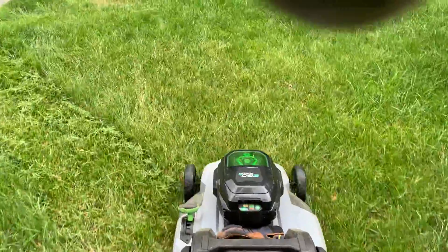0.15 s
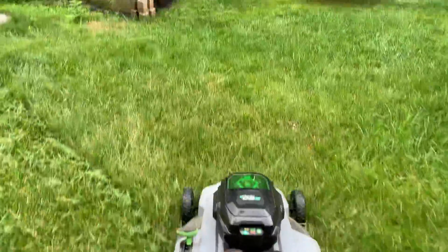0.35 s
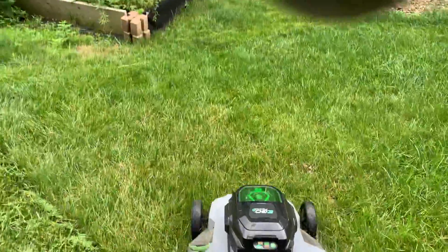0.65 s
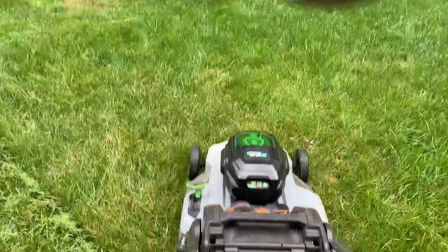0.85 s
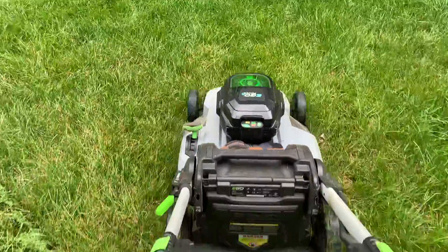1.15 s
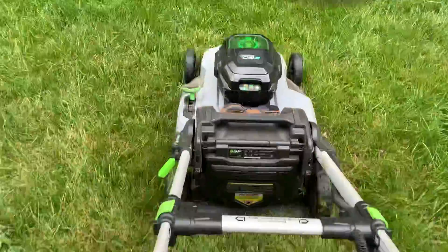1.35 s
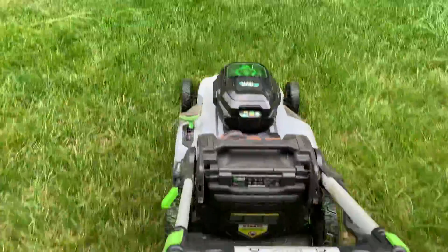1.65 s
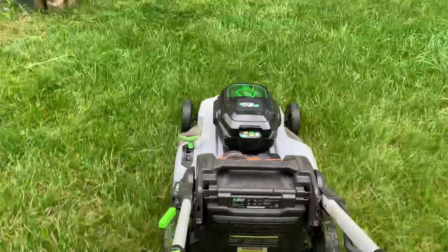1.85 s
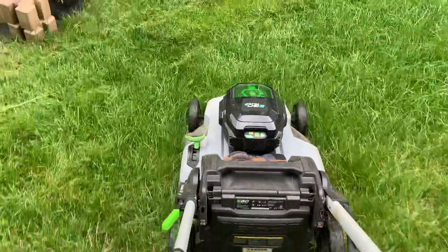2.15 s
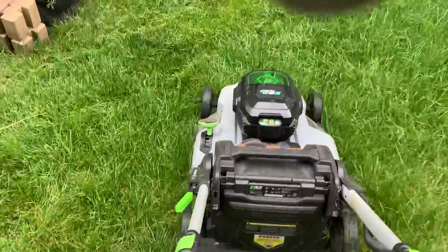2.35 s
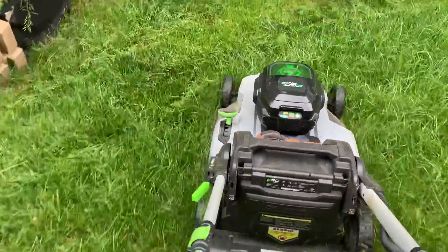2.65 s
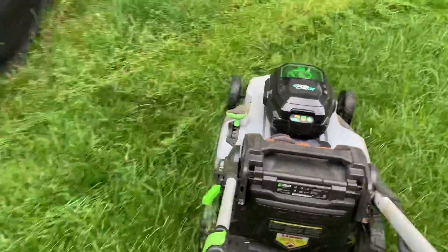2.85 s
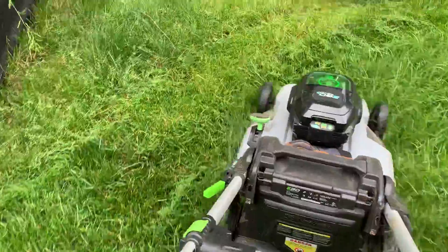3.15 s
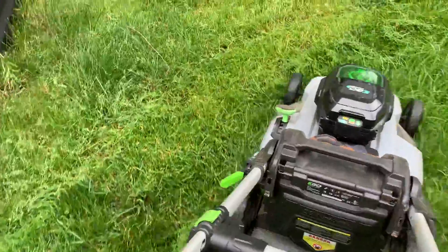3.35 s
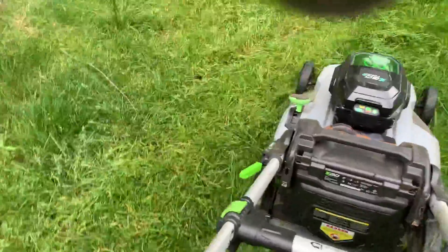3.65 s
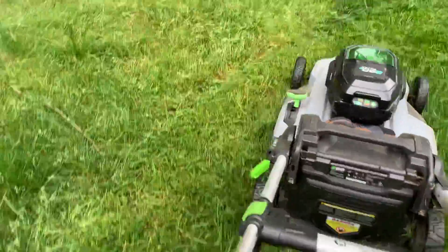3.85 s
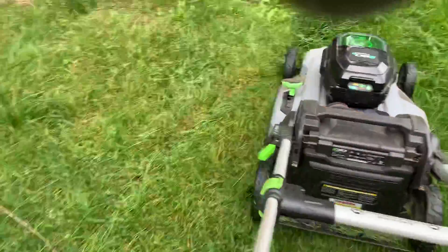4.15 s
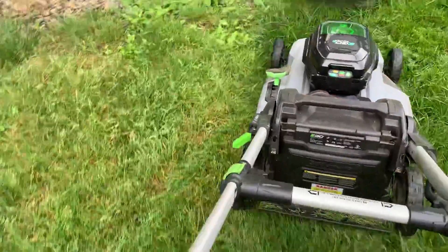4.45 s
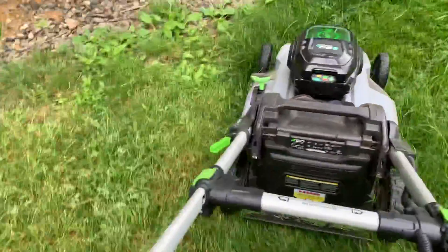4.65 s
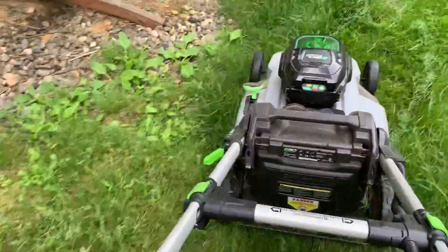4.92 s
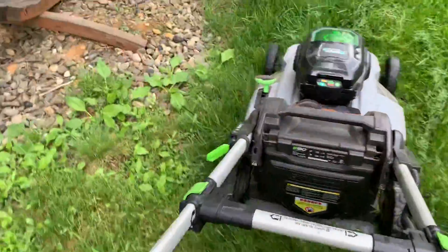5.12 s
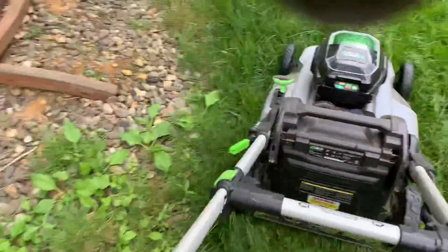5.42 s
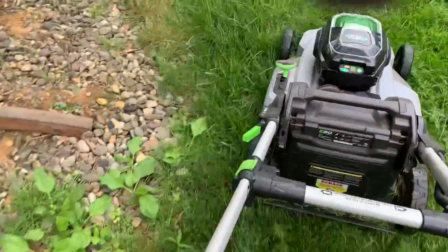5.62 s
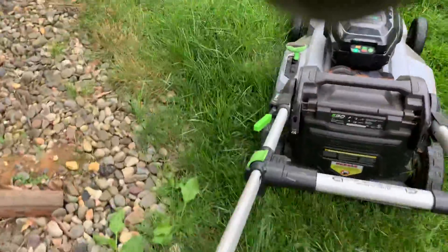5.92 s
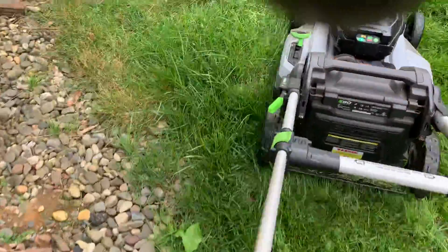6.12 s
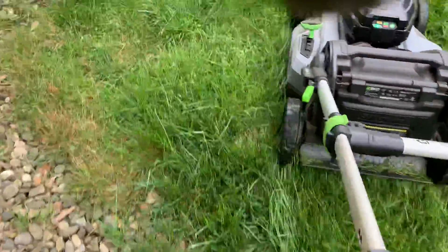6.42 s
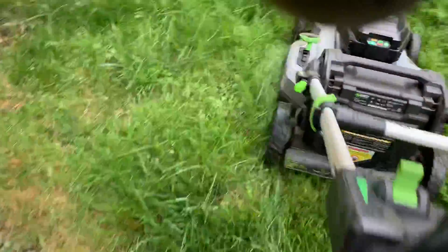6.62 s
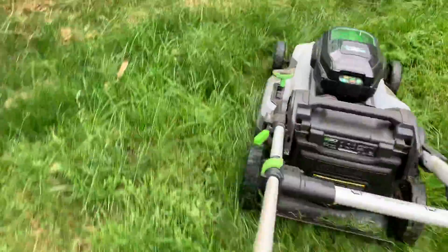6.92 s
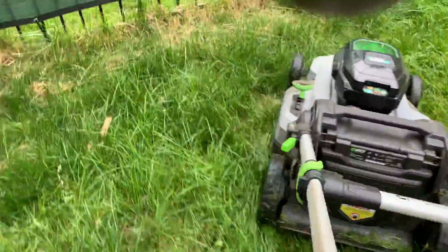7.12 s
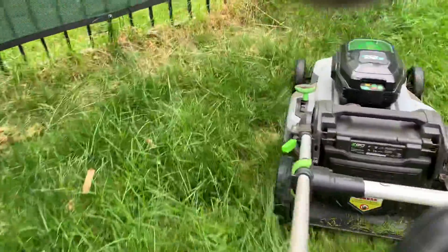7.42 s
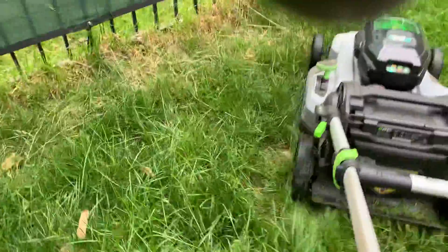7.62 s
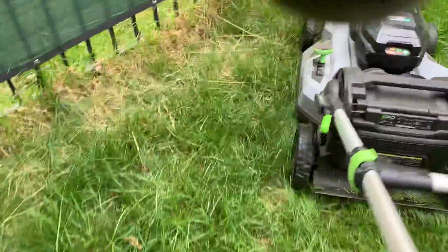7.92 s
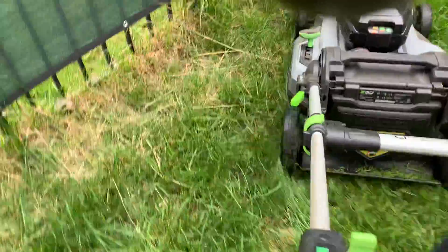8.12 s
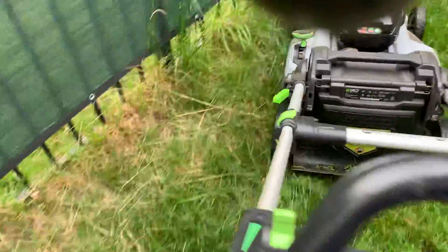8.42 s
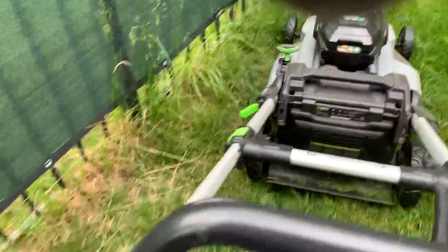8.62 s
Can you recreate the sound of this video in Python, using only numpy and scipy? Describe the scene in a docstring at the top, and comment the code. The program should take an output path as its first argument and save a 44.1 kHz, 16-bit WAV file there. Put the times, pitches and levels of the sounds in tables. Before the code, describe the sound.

A cordless electric mower hums and whines over a lawn, its drive whistling unsteadily, with thick grass thrashing and debris knocking the deck toward the end.

```python
"""Cordless mower on a lawn

A cordless mower pushed over a lawn, heard from the handle. The two-ended blade beats the air under the deck
as wavering harmonics; it speeds up, sags under load and starts to run down at the end. The motor whines
in step with it as thin sines, and the wheel drive whistles as a sine roughened by narrow noise.
Air and clippings roar and hiss as shaped stereo noise, thick grass thrashes in noise bursts,
and a few bits strike the deck as decaying sines and noise."""
import sys
import numpy as np
from scipy import signal
from scipy.fft import rfft, irfft, next_fast_len
from scipy.io import wavfile
from scipy.ndimage import uniform_filter1d, map_coordinates

SR = 44100
rng = np.random.default_rng(int(sys.argv[2]) if len(sys.argv) > 2 else 0)


def generate_wav(signal):
    """Clip the signal to [-1, 1] and save it as 16-bit WAV at the path in sys.argv[1]."""
    frames = np.transpose(np.atleast_2d(signal))
    scaled = np.clip(frames, -1, 1) * 32767
    pcm = np.round(scaled).astype(np.int16)
    wavfile.write(sys.argv[1], SR, pcm)


N = 386757

# Blade speed and its two strongest harmonics:
# (time [s], blade passes [Hz], first harmonic [dB], second harmonic [dB])
BLADE_COURSE = [(0.0, 95.61, -30, -28.5), (0.54, 98.5, -27.5, -23), (1.3, 107.2, -24, -22.5),
                (1.7, 108.2, -24, -24.5), (1.92, 111.1, -24.5, -22), (2.36, 111.9, -22.5, -20),
                (2.94, 109.7, -25.5, -20), (3.52, 110.1, -23, -20), (3.84, 104.7, -25.0, -26),
                (4.08, 103.3, -27, -22), (4.52, 104.9, -25.5, -22), (5.12, 110, -23.5, -24),
                (5.3, 107.9, -22.5, -20), (5.82, 110.5, -23.5, -20), (6.16, 106.3, -23, -18.5),
                (6.42, 108.4, -24.5, -17.5), (6.64, 107.7, -22, -27.5), (7.16, 108.9, -28.5, -17),
                (7.32, 107.3, -24.5, -24), (7.66, 107.4, -23.5, -25.5), (7.92, 109.4, -25, -24),
                (8.36, 106.3, -23.5, -21.5), (8.77, 99.8, -22, -37.5)]
# Colour of the hiss and of the sprayed clippings: (frequency [Hz], relative gain [dB])
HISS_COLOUR = [(3000, -4.5), (5500, -5), (8000, 0), (11500, 0), (16000, -7)]
MID_LAG_S, TREBLE_LAG_S = 4e-5, 1 / 4665  # delay of the left port behind the right


def amp(db):
    """Gain of a level in dB."""
    return 10 ** (np.asarray(db) / 20)


def unit(x):
    """x at rms 1."""
    return x / np.sqrt(np.mean(x ** 2) + 1e-20)


def along(points, hz):
    """Value at hz from (frequency [Hz], value) points on a log axis."""
    f, v = np.transpose(points)
    return np.interp(np.log(hz + 1), np.log(f + 1), v)


def shape(points):
    """Gain against frequency from (frequency [Hz], gain [dB]) points."""
    return lambda hz: amp(along(points, hz))


def curves(rows):
    """One value per sample for each column after the time."""
    s, *cols = np.transpose(rows)
    return [np.interp(np.arange(N) / SR, s, c) for c in cols]


def wobble(rate):
    """A smooth random curve, rate knots a second."""
    knots = rng.standard_normal(int(N * rate / SR) + 4)
    return map_coordinates(knots, [np.arange(N) * rate / SR])


def angle(hz):
    """Running phase of a changing frequency."""
    return 2 * np.pi * np.cumsum(hz) / SR


def filtered(x, response):
    """x passed through a complex response of frequency."""
    m = next_fast_len(N + SR // 2)
    return irfft(rfft(x, m) * response(np.fft.rfftfreq(m, 1 / SR)), m)[..., :N]


def lagged(pair, lag_s):
    """The left port hears the sound lag_s after the right."""
    sides = np.array([[1], [-1]])
    return filtered(pair, lambda hz: np.exp(-1j * np.pi * hz * lag_s * sides))


def tone(phase, db, flutter_db, smear, rate):
    """A sine around rms level db; its level and its phase (smear, radians) waver."""
    level = np.sqrt(2) * amp(db + flutter_db * wobble(rate))
    return level * np.sin(phase + smear * wobble(rate) + rng.uniform(0, 2 * np.pi))


def hoarse(phase, rate):
    """Narrow noise of rms 1 riding on a pitch; a higher rate widens it."""
    return unit(wobble(rate) * np.cos(phase) + wobble(rate) * np.sin(phase))


def rush(gain, patchy_db, lag_s):
    """Stereo noise of rms 1, coloured by gain, with time-frequency patches of random level."""
    # Left-right correlation of the noise: (frequency [Hz], likeness [0 to 1])
    likeness = [(60, 0.7), (300, 0.93), (700, 0.88), (1500, 0.67), (3000, 0.09), (5500, 0.46), (7500, 1),
                (15000, 1)]
    z = signal.stft(rng.standard_normal((2, N)), nperseg=512)[2]
    field = uniform_filter1d(rng.standard_normal(z.shape[1:]), size=6, axis=0)
    field = uniform_filter1d(field, size=10, axis=1)
    pair = signal.istft(z * amp(patchy_db * unit(field)), nperseg=512)[1][:, :N]

    def mid_side_gains(hz):
        """Split between middle and side that gives the wanted likeness."""
        turn = np.arccos(np.clip(along(likeness, hz), -1, 1)) / 2
        return gain(hz) * np.array([np.cos(turn), np.sin(turn)])

    mid, side = filtered(pair, mid_side_gains)
    return unit(lagged(np.array([mid + side, mid - side]), lag_s))


def air(phase):
    """Air and clippings swirl under the deck, throbbing with each pass; hiss reaches the right port first."""
    # Flow levels before the trims below: (time [s], roar [dB], rustle [dB], hiss [dB])
    flow = [(0.0, -32, -39, -39), (2.47, -31, -37.5, -38.5), (3.59, -30.5, -40.5, -39.5),
            (4.05, -31.5, -40, -40.5), (6.42, -32, -40.5, -39.5), (6.79, -31, -38.5, -41.5),
            (8.77, -29.5, -38.5, -38.5)]
    # Colours of the layers: (frequency [Hz], relative gain [dB])
    rumble_colour = [(22, -50), (45, -17), (80, -12.5), (140, -3), (250, 2), (400, -2.5), (700, -10.5),
                     (1200, -68)]
    roar_colour = [(150, -20), (350, -2.5), (600, -2.5), (1000, -2), (1380, -1.5), (1700, -6), (2250, -11),
                   (2500, -23), (4000, -50)]
    rustle_colour = [(900, -64), (2000, 3.5), (3000, -1), (4200, -1), (5500, -8), (7000, -13),
                     (10000, -101)]
    # Narrow air resonance of the deck: (time [s], level [dB])
    drone_course = [(0.0, -34), (0.09, -26), (0.3, -34), (0.7, -29), (1.0, -37), (1.32, -26.5), (1.45, -40),
                    (1.62, -27), (1.85, -36.5), (3.7, -40), (3.9, -32.5), (4.4, -33), (5.4, -37.5),
                    (5.62, -26.5), (5.86, -42), (6.55, -40), (7.15, -29.5), (7.9, -34.5), (8.67, -44),
                    (8.77, -44)]
    roar_db, rustle_db, hiss_db = curves(flow)
    throb = np.cos(phase) + .3 * np.cos(phase / 2 + 1.16)  # the two blade ends differ
    gust = wobble(9)

    rumble_db = -25.5 + 0.48 * wobble(1.9) + 1.0 * throb
    roar_db = roar_db + 3.5 + 0.78 * gust + 1.7 * throb
    rustle_db = rustle_db + 5.5 + 1.0 * gust + 0.49 * throb
    hiss_db = hiss_db + 6.0 + 0.48 * gust + 0.73 * wobble(30) + 0.88 * throb
    out = amp(rumble_db) * rush(shape(rumble_colour), patchy_db=.5, lag_s=0)
    out += amp(roar_db) * rush(shape(roar_colour), patchy_db=0.7, lag_s=MID_LAG_S)
    out += amp(rustle_db) * rush(shape(rustle_colour), patchy_db=2.0, lag_s=MID_LAG_S)
    out += amp(hiss_db) * rush(shape(HISS_COLOUR), patchy_db=2.0, lag_s=TREBLE_LAG_S)

    resonance = lambda hz: 1 / (1 + ((hz - 750) / 16) ** 2)
    return out + amp(curves(drone_course)[0]) * rush(resonance, patchy_db=0.5, lag_s=MID_LAG_S)


def tufts(phase):
    """Thick grass thrashes the deck in lumps at each pass and sprays out clippings."""
    # Patches of thick grass: (start [s], length [s], thrash [dB], spray [dB])
    patches = [(6.709, 0.087, -18.5, -50), (7.035, 0.2, -22.5, -52), (7.203, 0.077, -26, -33),
               (7.417, 0.087, -35, -32), (7.725, 0.39, -20.5, -34.5)]
    # Colour of the thrash: (frequency [Hz], relative gain [dB])
    thrash_colour = [(60, -23), (140, 6), (550, -2), (1000, -5.5), (1800, -14), (3000, -22.5), (4500, -45)]
    t = np.arange(N) / SR
    thrash, spray = np.zeros((2, N))
    for s, length, thrash_db, spray_db in patches:
        swell = np.sin(np.pi * np.clip((t - s) / length, 0, 1) ** 0.49)  # rises faster than it falls
        thrash += amp(thrash_db) * swell
        spray += amp(spray_db) * swell
    lumps = amp(1.4 * wobble(110) + 1.5 * wobble(35) + 2.5 * np.cos(phase))
    return (thrash * lumps * rush(shape(thrash_colour), patchy_db=3.0, lag_s=MID_LAG_S)
            + spray * rush(shape(HISS_COLOUR), patchy_db=-3.0, lag_s=TREBLE_LAG_S))


def strikes():
    """Bits flung by the blade: a short tick, a crack, a dull knock and the deck's thump, all dying away."""
    # Each hit: (time [s], overall level [dB], tick pitch [Hz], then levels within the hit:
    # crack [dB], knock [dB], thump [dB])
    hits = [(5.669, -14, 2005, -2, -4, -12), (5.676, -17, 3370, -8, -12, -15),
            (5.735, -14.5, 2250, -5, -4, -12), (6.71, -11, 3000, -5, 0, -8), (6.717, -12, 820, -10, 2, -6),
            (7.067, -17, 2800, -1, 1, -6), (7.113, -16, 850, -7, 2, -5), (7.146, -17, 900, -7, 3, -10),
            (7.218, -18, 750, -10, 3, 0), (7.768, -21, 1595, -2, 2, -5), (7.798, -18, 960, -6, 1, -4),
            (7.814, -15, 420, -12, 5, 4), (7.866, -21, 1346, -7, 5, 0), (7.881, -17.5, 1200, -6, 3, 5)]
    deck_hz = 225
    crack_band = signal.butter(3, [1000, 3800], 'band', fs=SR, output='sos')
    knock_band = signal.butter(2, [150, 1400], 'band', fs=SR, output='sos')
    out, t = np.zeros(N + SR), np.arange(SR // 10) / SR
    onset = 1 - np.exp(-t / 0.0014)
    for s, db, hz, crack_db, knock_db, thump_db in hits:
        # each part falls 60 dB in the time [s] that divides t
        tick = amp(-2.5 - 60 * t / 0.02) * np.sin(2 * np.pi * hz * t)
        crack = signal.sosfilt(crack_band, 2 * rng.standard_normal(len(t)))
        crack *= amp(crack_db - 60 * t / 0.03)
        knock = signal.sosfilt(knock_band, 3 * rng.standard_normal(len(t)))
        knock *= amp(knock_db - 60 * t / 0.035)
        thump = amp(thump_db - 60 * t / 0.083) * np.sin(2 * np.pi * deck_hz * t)
        out[round(s * SR):][:len(t)] += amp(db) * (tick + crack + knock + thump) * onset
    return out[:N]


def drive():
    """The wheel drive whistles hoarsely, pulsing each turn, slowed by bumps; gears whirr an octave up."""
    # Wheel drive, levels before the trims below:
    # (time [s], free-running whistle [Hz], whistle [dB], gear whirr [dB])
    drive_course = [(0.0, 2223, -45, -45), (0.7, 2166, -39, -42), (0.95, 2170, -48, -44),
                    (1.9, 2180, -38, -38.5), (2.2, 2172, -43, -39), (2.34, 2163, -39, -34),
                    (2.5, 2186, -38.5, -41), (2.9, 2225, -35, -36), (3.22, 2232, -38, -40.5),
                    (3.5, 2200, -41, -46), (4.15, 2207, -39, -40.5), (4.35, 2225, -41.5, -44),
                    (5.0, 2250, -37, -40.5), (5.25, 2170, -42, -43), (5.6, 2210, -36, -41),
                    (5.77, 2260, -36.5, -45), (5.95, 2207, -48, -50), (6.2, 2175, -35, -41),
                    (6.38, 2230, -39, -60), (6.62, 2155, -42, -40), (6.8, 2160, -47, -50),
                    (6.96, 2160, -40, -37), (7.13, 2300, -38, -47), (7.34, 2255, -41, -54),
                    (7.45, 2247, -35, -51), (7.58, 2270, -41, -50), (7.72, 2250, -37, -41),
                    (7.88, 2257, -38, -41), (8.0, 2270, -41, -39), (8.12, 2280, -44, -43),
                    (8.35, 2217, -42, -61), (8.55, 2190, -42, -35.5), (8.77, 2224, -41, -39)]
    # A wheel hits a bump and the drive slows: (time [s], sag of the whistle [Hz])
    bumps = [(.58, 70.3), (.84, 70.7), (1.13, 80.2), (1.45, 80.2), (1.79, 89.9), (2.11, 69.5),
             (2.49, 89.86), (2.66, 175.1), (2.8, 100.1), (2.95, 120.3), (3.12, 100.2), (3.38, 120.3),
             (3.52, 90.6), (3.74, 118.4), (3.98, 189.2), (4.27, 130.7), (4.48, 71.1), (4.62, 159.5),
             (4.79, 120.2), (4.89, 189.6), (5.12, 110), (5.35, 70.3), (5.49, 119.6), (5.69, 89.3),
             (5.84, 190), (6.08, 139.8), (6.29, 131), (6.5, 282), (6.67, 70), (6.85, 260), (7.05, 170),
             (7.245, 289), (7.46, 109.8), (7.67, 290), (7.82, 151), (7.99, 298), (8.22, 140.2),
             (8.39, 90.2), (8.53, 100.2), (8.69, 200)]
    teeth = 46  # whistle cycles in one turn of the drive shaft
    sag_s, recover_s, shake_hz = .035, .045, 14  # slowing down, picking up again, shaking in between
    free_hz, whistle_db, whirr_db = curves(drive_course)
    t = np.arange(N) / SR
    sag_hz = sum(hz * np.exp(-((t - s) / np.where(t < s, sag_s, recover_s)) ** 2) for s, hz in bumps)
    phase = angle(free_hz - sag_hz + shake_hz * wobble(13))
    turn = unit(amp(5 * np.cos(phase / teeth) + 2 * np.cos(2 * phase / teeth + .8)))  # uneven mesh

    whistle = tone(phase, whistle_db + 1.5, flutter_db=1.2, smear=.3, rate=40)
    whistle += amp(whistle_db - 7) * hoarse(phase, rate=150)
    octave = amp(whirr_db - 3 + 3 * wobble(14)) * hoarse(2 * phase, rate=360)
    band = lambda hz: 1 / (1 + ((hz - 4300) / 310) ** 4)
    broad = amp(whirr_db - 5) * rush(band, patchy_db=2, lag_s=0)
    return turn * whistle + np.sqrt(turn) * octave + broad


def motor(passes_hz):
    """Thin tones locked to the blade speed, loud while they cross the housing's resonances."""
    # Pitch of each motor tone: (multiple of blade passes)
    whine_orders = (12.35, 12.8, 14.22)
    # Strength of each motor tone, added to the housing's: (relative level [dB])
    whine_db = (0, -1, -6.5)
    # The motor housing favours some pitches: (frequency [Hz], level [dB])
    housing = [(1200, -48), (1290, -45), (1335, -38), (1378, -32.5), (1400, -35.5), (1430, -38),
               (1480, -36), (1540, -55), (1600, -48)]
    whine = 0
    for order, db in zip(whine_orders, whine_db):
        hz = order * passes_hz
        level_db = db + along(housing, hz) + 0.8 * wobble(2)
        whine += tone(angle(hz), level_db, flutter_db=1.4, smear=.22, rate=15)
    return whine


def blade(passes_hz):
    """Each pass pushes the air; grass and turbulence roughen the higher harmonics more."""
    # The third harmonic is loudest where the deck booms: (frequency [Hz], level [dB])
    deck_boom = [(285, -28), (310, -24), (325, -29), (340, -31.5)]
    # The hum dips or swells briefly, change in level:
    # (centre [s], half width [s], first harmonic [dB], second harmonic [dB], third harmonic [dB])
    dips = [(.27, 0.027, -1, -13, 2.5), (.36, 0.024, -1, 0, -12), (.58, 0.04, 1, -13, -6),
            (.76, 0.093, 1, 3.5, 2), (1.18, 0.028, -2, -9, -1), (1.3, 0.032, 0, 0, -6),
            (1.39, 0.053, -2, 1.5, 5), (3.19, 0.1, -1.5, -13, -15), (4.3, 0.089, -1, -5, -2),
            (5.86, 0.036, -4, -8, 7), (6.04, 0.05, 1, -18, -1), (6.36, 0.061, 0.5, -18, -19),
            (6.72, 0.049, -3, -4, 0.5), (7.18, 0.083, -5, -7, 2.5), (7.43, 0.069, -1, -15, 0.5),
            (8.1, 0.081, 3, -2, 10), (8.22, 0.051, 1, -3, -16), (8.7, 0.18, -3, 5.5, -17)]
    # Fourth harmonic: (time [s], level [dB])
    fourth_course = [(0, -36.5), (1.4, -35), (1.9, -29), (2.55, -35.5), (3.2, -30.5), (3.8, -33),
                     (4.3, -28.5), (4.75, -33), (5.8, -34), (6.2, -40), (6.5, -30), (6.9, -38), (7.4, -32),
                     (8.0, -35), (8.77, -35.5)]
    # Higher harmonics: (multiple of blade passes, level [dB])
    weak_orders = [(5, -39.5), (6, -40.5), (7, -44), (8, -43.5), (9, -47)]
    phase, t = angle(passes_hz), np.arange(N) / SR
    levels_db = np.array([*curves(BLADE_COURSE)[1:], along(deck_boom, 3 * passes_hz)])
    for s, half, *change_db in dips:
        levels_db += np.outer(change_db, np.exp(-((t - s) / half) ** 4))
    first_db, second_db, third_db = levels_db

    hum = tone(phase, first_db, flutter_db=0.8, smear=0.066, rate=12)
    hum += tone(2 * phase, second_db, flutter_db=2.0, smear=0.45, rate=12)
    hum += tone(3 * phase, third_db, flutter_db=2.4, smear=.8, rate=14)
    hum += tone(4 * phase, curves(fourth_course)[0], flutter_db=3, smear=1.1, rate=16)
    hum += tone(phase / 2, -47, flutter_db=4.0, smear=.2, rate=6)  # unbalance, once a turn of the blade
    for k, db in weak_orders:
        hum += tone(k * phase, db, flutter_db=3.5, smear=1.1, rate=16)
    return hum


def scene():
    """All parts together, the tones nearly central."""
    passes_hz = curves(BLADE_COURSE)[0] + .12 * wobble(6)
    phase = angle(passes_hz)
    central = blade(passes_hz) + motor(passes_hz) + strikes()
    near = np.ones((2, 1)) * central + drive()
    return air(phase) + tufts(phase) + lagged(near, 3e-5)


def record(dry):
    """The two ports differ in colour and lose the deep bass; nothing is kept above the band limit."""
    # Colour difference of the ports: (frequency [Hz], left over right [dB])
    port_lean = [(110, 2), (170, -1.2), (300, -.3), (700, 2.5), (1500, 2.5), (2400, 5), (4200, 1.5),
                 (6200, -2), (8000, 0)]
    bass_hz, top_hz = 36, 15770
    halves = np.array([[.5], [-.5]])  # each port takes half the difference

    def response(hz):
        """Bass roll-off, band limit and port colour."""
        bass = 1 / np.sqrt(1 + (bass_hz / (hz + 1)) ** 4)
        return (hz < top_hz) * bass * amp(along(port_lean, hz) * halves)

    return filtered(dry, response)


dry = scene()
out = record(dry)
generate_wav(out)
```